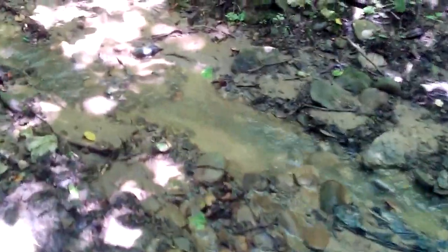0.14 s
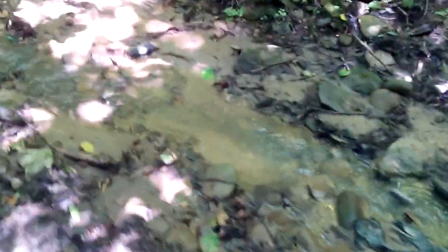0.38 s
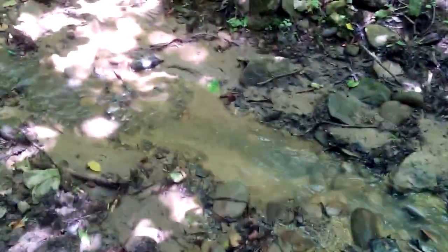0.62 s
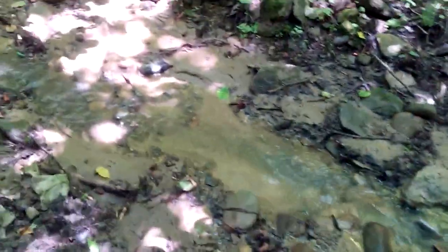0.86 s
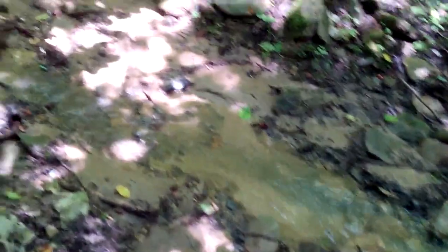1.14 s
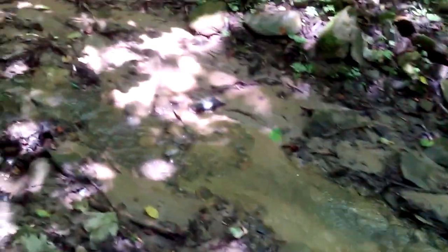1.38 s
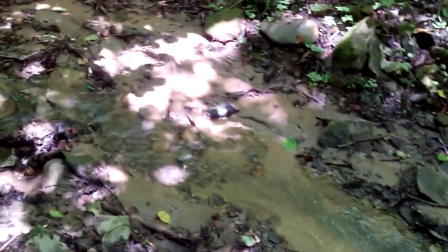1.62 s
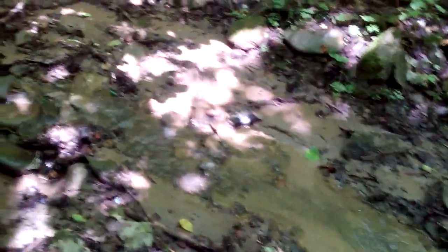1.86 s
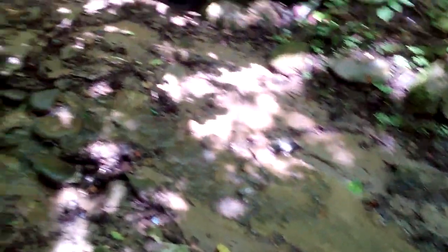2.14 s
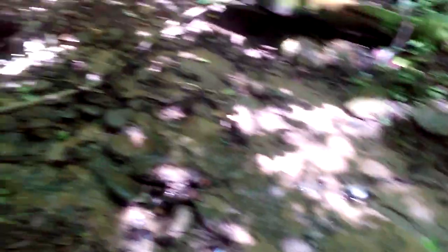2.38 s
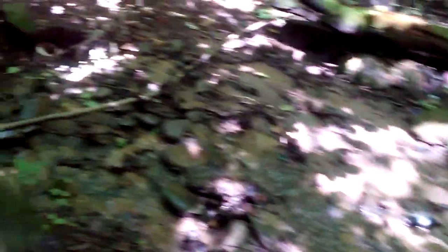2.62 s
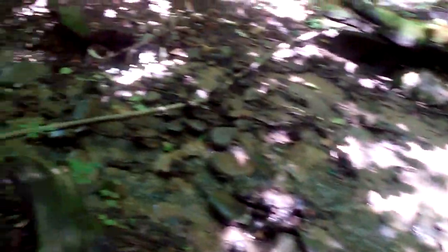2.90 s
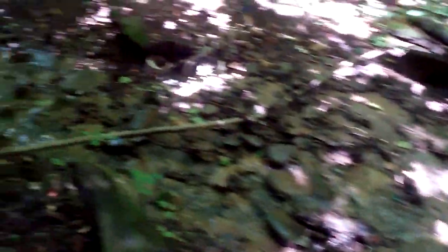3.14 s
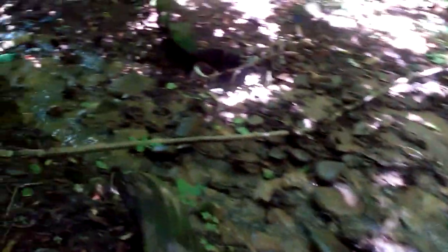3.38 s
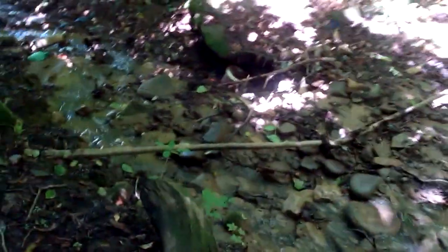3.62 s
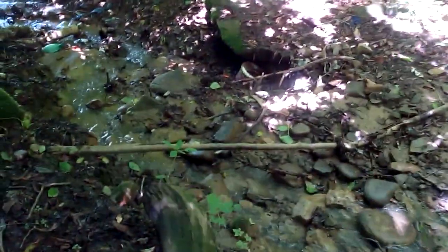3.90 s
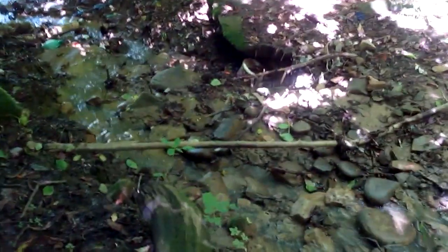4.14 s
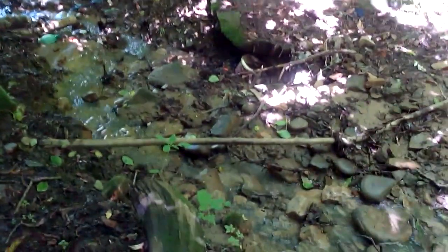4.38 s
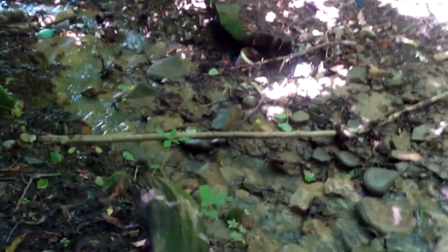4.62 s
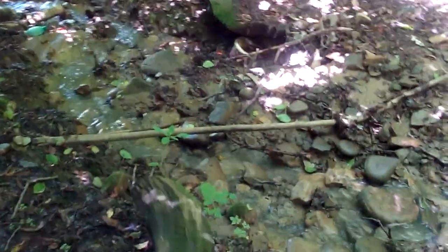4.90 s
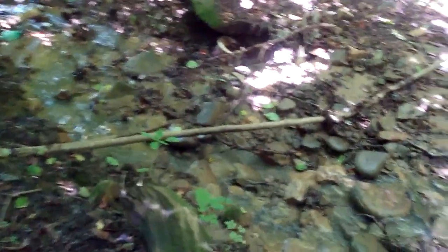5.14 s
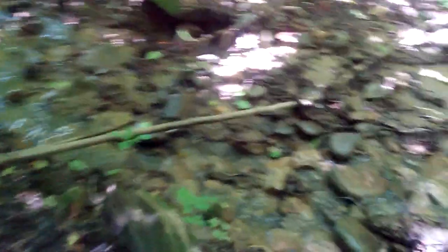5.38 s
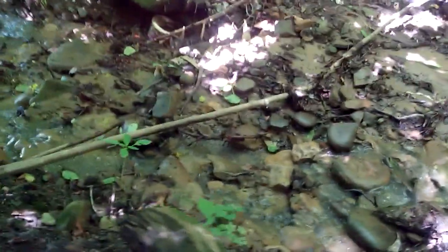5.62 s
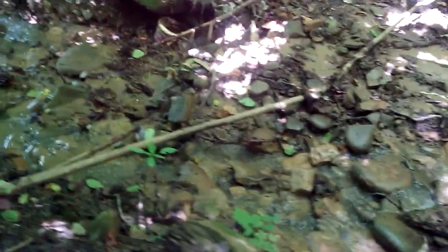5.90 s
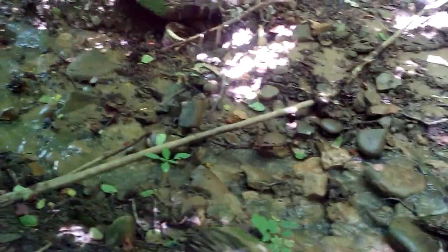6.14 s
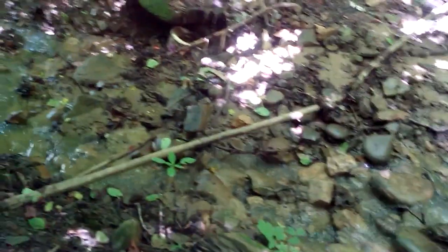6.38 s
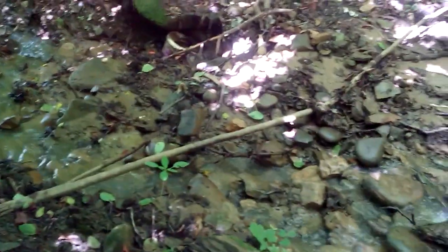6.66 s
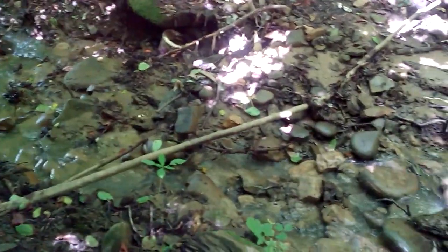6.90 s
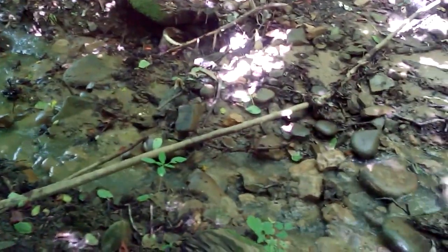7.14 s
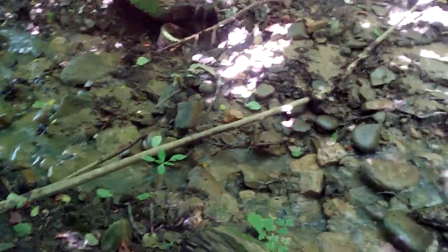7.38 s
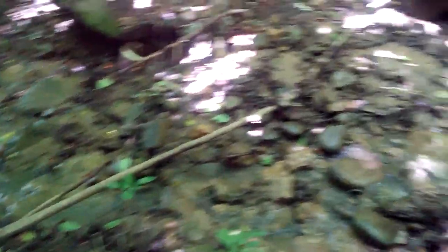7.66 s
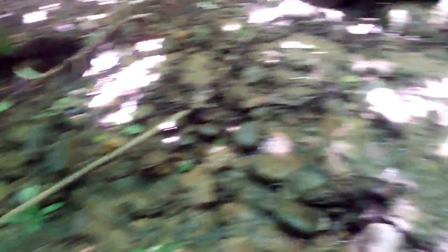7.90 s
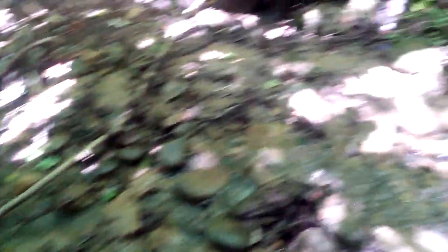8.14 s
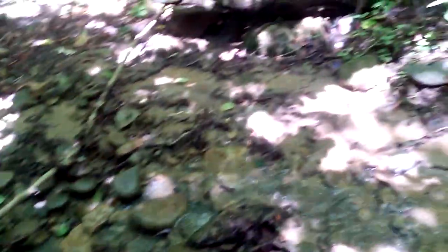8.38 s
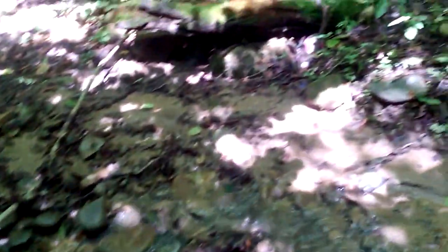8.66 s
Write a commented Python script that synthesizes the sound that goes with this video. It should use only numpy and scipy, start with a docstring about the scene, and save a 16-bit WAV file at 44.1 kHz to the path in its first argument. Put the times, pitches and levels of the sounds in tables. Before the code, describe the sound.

A shallow woodland stream trickles softly and continuously over stones, heard from a step away on a handheld microphone. Small bubbles plip and ring at scattered pitches above a fine bubbling texture and faint splashing ticks. A little hollow gurgle sits underneath. Just after eight seconds, a sharp dry snap cracks right at the microphone, far louder than the water, and the trickle goes on.

```python
"""A shallow forest stream trickles over pebbles a step from a handheld microphone.
Near bubbles ring for a few cycles, each with a wet spray, over swarms of small bubbles and droplet ticks.
A hollow under a stone gurgles by releasing large bubbles of nearly one size; shaped noise is farther water.
Soft low thuds are windowed sines; late on, something snaps right by the microphone: decaying modes, echo."""
import sys
import numpy as np
from scipy import signal
from scipy.io import wavfile
from scipy.ndimage import uniform_filter1d

SR = 44100
rng = np.random.default_rng(int(sys.argv[2]) if len(sys.argv) > 2 else 0)


def natural_amplitude(level_db):
    """Convert a level in decibels to a linear amplitude factor, elementwise."""
    exponent = np.asarray(level_db, float) / 20
    return 10 ** exponent


def put_to_file(sound):
    """Save the sound as 16-bit audio at rate SR, in the file named by the first command-line argument."""
    columns = np.atleast_2d(sound).T  # one column per channel
    safe = np.clip(columns, -1, 1)
    whole_steps = np.round(safe * 32767)
    wavfile.write(sys.argv[1], SR, whole_steps.astype(np.int16))


N = 386757

# clearest bubbles: (time [s], level [dB], nominal pitch [Hz], ring length to half amplitude [cycles])
CLEAR_BUBBLES = [(0.1371, -42, 1200, 10), (0.3636, -41.5, 5890, 8.3), (0.482, -40, 6180, 6),
                 (0.5087, -37.5, 1594, 11), (0.5898, -44.5, 646, 9), (0.6593, -43, 1035, 6.7),
                 (0.6928, -40, 5940, 9), (0.8891, -39, 5700, 17), (0.931, -37.5, 3000, 9),
                 (0.974, -39.5, 2190, 6), (1.005, -38, 2840, 10), (1.105, -39.5, 1460, 8.7),
                 (1.3533, -38, 2180, 10), (1.8511, -39.5, 1700, 7), (2.1263, -36.5, 1900, 5.5),
                 (2.4237, -36.5, 3880, 5.6), (2.6265, -38.5, 3420, 12), (2.6433, -40.5, 975, 6.4),
                 (2.6657, -50, 906, 14), (2.6931, -44, 8650, 5), (2.7047, -36, 3840, 7),
                 (2.7351, -44, 970, 8), (2.8105, -43, 7490, 7.6), (2.892, -37.5, 2870, 8.4),
                 (2.9367, -39.5, 7800, 9.2), (3.2188, -40.5, 2160, 11), (3.3136, -38, 3470, 7.7),
                 (3.462, -39, 1770, 7), (3.4949, -34.5, 2180, 7), (3.7694, -39, 3560, 7),
                 (3.824, -40, 9080, 7), (3.9194, -38, 3070, 4), (4.2008, -36.5, 2050, 8.2),
                 (4.2257, -38, 7940, 6.6), (4.324, -38.5, 6180, 6.3), (4.3322, -40, 2730, 8),
                 (4.5492, -37.5, 3140, 9.2), (4.5502, -48.5, 553, 5.1), (4.739, -44.5, 1070, 6.4),
                 (4.8768, -39, 1190, 5.3), (4.901, -37.5, 4630, 7.4), (4.9347, -43, 523, 2.8),
                 (4.9581, -44.5, 480, 3.8), (5.1502, -37, 1140, 6.7), (5.2195, -42, 1155, 14),
                 (5.24, -39, 7140, 6), (5.456, -37, 1520, 7.2), (5.483, -40.5, 1610, 6.8),
                 (5.7643, -36.5, 1950, 4.8), (6.2043, -38, 3980, 9), (6.253, -42.5, 940, 8.7),
                 (6.27, -35.5, 2500, 6.7), (6.2751, -43, 1090, 15), (6.2915, -41, 1900, 7),
                 (6.314, -41, 1020, 3.2), (6.895, -36.5, 2750, 9), (6.9524, -44.5, 528, 6.3),
                 (7.0561, -37, 1860, 7), (7.0696, -33, 1770, 8.1), (7.0835, -41, 1770, 8),
                 (7.2873, -40, 1740, 7), (7.418, -39.5, 1770, 8), (7.5312, -38.5, 2730, 5),
                 (7.6798, -39.5, 1780, 11), (8.044, -36.5, 2090, 6.8), (8.208, -39, 1160, 7.5),
                 (8.4561, -39, 5890, 7.9), (8.4773, -43, 5620, 10), (8.5017, -38.5, 1840, 6),
                 (8.6517, -37, 1860, 9), (8.6789, -38.5, 2150, 6.1), (8.7329, -39, 1830, 9.1)]
# chance bubbles, typical level by pitch: (pitch [Hz], level [dB])
PLIP_LEVELS = [(800, -51.5), (1400, -46), (3000, -44), (9500, -45.5)]
# swarm of small near bubbles, relative power density: (pitch [Hz], density [dB per Hz])
SWARM_SPECTRUM = [(250, -6), (400, -13.5), (520, -2.5), (760, -1.5), (1100, 2.5), (1760, 4), (2600, -4),
                  (3900, -3.5), (4800, -10), (7600, -11), (12000, -29)]
# running water: (time [s], gain of wash, swarm and splashes [dB], gurgle level [dB])
FLOW_COURSE = [(0, -0.1, -64), (1, 0.04, -70), (1.9, -.5, -65.5), (2.2, -0.4, -67), (3, -0.15, -63.5),
               (4, 0.2, -65), (5, .5, -64.5), (5.3, 1, -65.5), (6, 1.2, -68.5), (7, 0.45, -67),
               (7.6, .5, -69.5), (8.77, 0, -69)]
# snap: (time [s], peak of the blow [dB])
SNAP_EVENT = (8.1563, -6.5)
# snap modes: (frequency [Hz], level before swing factor [dB], t60 [s], first swing factor [+ out, - in])
SNAP_RINGS = [(118, -26.5, 0.044, -0.85), (192, -24.5, 0.022, -1), (700, -20, 0.013, 0.8),
              (1350, -13.5, 0.0049, 0.84), (1720, -15, 0.0046, 1), (4260, -9, 0.0019, 1),
              (6300, -1, 0.00093, 0.94), (9700, -9.5, 0.0011, -1), (12700, -11, 0.0013, 1)]
# soft low thuds, as of fingers shifting on the microphone: (time [s], level [dB])
FINGER_THUDS = [(2.166, -56), (4.3, -56), (7.265, -53), (8.617, -54)]
# farther water, relative power density: (frequency [Hz], density [dB per Hz])
WASH_SPECTRUM = [(30, -14), (60, -15), (108, -13.5), (262, -11), (388, -14.5), (517, -5), (764, -9.5),
                 (1290, -5), (1760, -1), (2350, -3), (2750, -7.5), (3860, -4), (4760, -10), (7800, -13),
                 (9000, -17), (11300, -20), (11800, -25), (15400, -22.5)]


def evened(x):
    """Scales to rms 1."""
    return x / np.sqrt(np.mean(x ** 2) + 1e-20)


def read(points, hz):
    """Reads a spectrum on a log-frequency axis."""
    f, value = np.transpose(points)
    return np.interp(np.log(hz + 1), np.log(f + 1), value)


def add(mix, start_s, sound):
    """Mixes a sound in at start_s."""
    part = mix[round(start_s * SR):][:len(sound)]
    part += sound[:len(part)]


def bubble(hz, half_cycles):
    """A pocket of air pinches off with a tick, rings, and climbs a little in pitch as it rises."""
    turns = np.arange(0, 4 * half_cycles + 2, hz / SR)
    envelope = (1 - np.exp(-turns / 0.24)) * .5 ** ((turns / half_cycles) ** 1.34)
    ring = envelope * np.sin(2 * np.pi * turns * (.99 + .0012 * turns))
    # the pinch is brighter than the ring
    tick = 3.48 * turns * np.exp(-turns / 0.6) * np.sin(2 * np.pi * 1.367 * turns)
    return ring + tick


def spatter(hz, noise):
    """The drop that makes a near bubble also throws a short wet spray, wide in pitch."""
    t = np.arange(len(noise)) / SR
    turns = np.arange(0, 2, 1.16 * hz / SR)
    wide = np.hanning(len(turns)) * np.sin(2 * np.pi * turns)  # two cycles span more than an octave
    spray = evened(np.convolve(noise, wide)[:len(t)])
    attack_s, decay_s = 0.0001, 0.0028
    return spray * (1 - np.exp(-t / attack_s)) * np.exp(-t / decay_s)


def plips():
    """Chance rows like CLEAR_BUBBLES; a gap between stones often soon frees another of like size."""
    rate_per_s, low_hz, high_hz = 20, 800, 9490
    spread_db, min_cycles, max_cycles = 4, 4.5, 10
    train_share, train_gap_s, pitch_scatter = .4, .018, .08
    gap, pitch, luck, length, again, stray = rng.random((500, 6)).T
    follows = again < train_share
    pause_s = (1 / rate_per_s - train_share * train_gap_s) / (1 - train_share)  # holds the mean rate
    born_s = np.cumsum(-np.log(1 - gap) * np.where(follows, train_gap_s, pause_s))
    leader = np.maximum.accumulate(np.where(follows, 0, np.arange(len(gap))))
    hz = low_hz * (high_hz / low_hz) ** pitch[leader]
    hz = hz * (1 + pitch_scatter * (2 * stray - 1))
    db = read(PLIP_LEVELS, hz) + spread_db * (2 * luck - 1)
    half_cycles = min_cycles + (max_cycles - min_cycles) * length
    return list(zip(born_s, db, hz, half_cycles))[:np.sum(born_s < N / SR)]


def shower(pitches_hz, levels_db, per_s, spread_db, cycles):
    """Each bubble size has its own random train; most are faint, a few stand out; rms 1."""
    out = np.zeros(N)
    for hz, db in zip(pitches_hz, levels_db):
        when, luck, length = rng.random((1000, 3)).T
        born_s = np.cumsum(-np.log(1 - when)) * len(pitches_hz) / per_s  # uneven gaps
        inside = born_s < N / SR
        strength = natural_amplitude(spread_db * np.minimum(-np.log(1 - luck), 2.8))
        train = np.zeros(N)
        train[(born_s[inside] * SR).astype(int)] = strength[inside]
        # sqrt(hz) offsets the shorter rings of small bubbles
        voice = natural_amplitude(db) * np.sqrt(hz) * bubble(hz, cycles * (.5 + length[0]))
        out += signal.oaconvolve(train, voice)[:N]
    return evened(out)


def swarm():
    """Small bubbles across all sizes; small ones are born per octave as often as large ones."""
    hz = np.geomspace(240, 13000, 70)
    width_db = 10 * np.log10(hz)  # power per Hz times the span that each size covers
    levels_db = read(SWARM_SPECTRUM, hz) + width_db
    return natural_amplitude(-53.5) * shower(hz, levels_db, per_s=1500, spread_db=3.0, cycles=6.3)


def splashes():
    """Droplets thrown off the pebbles land with short bright ticks."""
    hz = np.geomspace(2500, 7000, 12)
    return natural_amplitude(-62.5) * shower(hz, -3 * np.log2(hz), per_s=150, spread_db=4.0, cycles=1.37)


def surge(depth_db):
    """The water slops unevenly over the pebbles: a gain swinging at 3 to 60 Hz, rms depth_db."""
    t = np.arange(0, N / SR + .01, .002)
    slop = sum(np.sin(2 * np.pi * (f * t + rng.random())) / f ** 0.23 for f in np.geomspace(3, 60, 30))
    return natural_amplitude(depth_db * np.interp(np.arange(N) / SR, t, evened(slop)))


def gurgle():
    """The hollow under a stone keeps releasing large bubbles of nearly one size; rms 1."""
    hollow_hz = 493
    hz = hollow_hz * np.linspace(.95, 1.1, 6)
    return shower(hz, 0 * hz, per_s=40, spread_db=2.0, cycles=4.6)


def snap():
    """A sharp blow rings its modes; the stones send back a scattered echo."""
    t = np.arange(4000) / SR
    rings = sum(swing * natural_amplitude(db - 60 * t / t60_s) * np.sin(2 * np.pi * hz * t)
                for hz, db, t60_s, swing in SNAP_RINGS)
    contact_s = 0.000078
    blow = np.convolve(rings, np.hanning(4))[:len(t)] * (1 - np.exp(-t / contact_s))
    late_s = np.maximum(t - .001, 0)
    scatter = rng.standard_normal(len(t)) * late_s / 0.0032 * np.exp(-late_s / 0.0035)
    crack = np.diff(blow[:12] * np.hanning(12), prepend=0)  # only the bright edge scatters
    echo = natural_amplitude(-24.0) * np.convolve(scatter, crack)[:len(t)]
    peak_db = SNAP_EVENT[1]
    return natural_amplitude(peak_db) * (blow + echo) / np.max(blow)


def thud():
    """A soft low knock: about two cycles of 170 Hz under a smooth window."""
    n = np.arange(500)
    return np.hanning(500) * np.sin(2 * np.pi * 170 * n / SR)


def wash():
    """Farther water blurs into noise: random short-time spectra with small louder and softer patches."""
    frames, hz = N // 128 + 5, np.fft.rfftfreq(512, 1 / SR)
    real, imag, patches = rng.standard_normal((frames, 257, 3)).T
    patches = uniform_filter1d(patches, size=8, axis=0)
    patches = evened(uniform_filter1d(patches, size=8, axis=1))
    level_db = read(WASH_SPECTRUM, hz)[:, None] + 1.73 * patches
    spectra = (real + 1j * imag) * natural_amplitude(level_db)
    noise = signal.istft(spectra, nperseg=512, noverlap=384)[1][:N]
    return natural_amplitude(-53) * evened(noise)


def preamp_flutter():
    """Low flutter of the preamp: leaky-integrated noise."""
    return natural_amplitude(-90) * evened(signal.lfilter([1], [1, -.995], rng.standard_normal(N)))


def scene():
    """Running water, near bubbles with their spray, thuds and the snap."""
    time_s, flow_db, gurgle_db = np.transpose(FLOW_COURSE)
    t = np.arange(N) / SR
    water = wash() + surge(depth_db=1.41) * (swarm() + splashes())
    mix = natural_amplitude(np.interp(t, time_s, flow_db)) * water
    mix += natural_amplitude(np.interp(t, time_s, gurgle_db)) * gurgle()
    drops = CLEAR_BUBBLES + plips()
    noises = rng.standard_normal((len(drops), 600))
    for (start_s, db, hz, half_cycles), noise in zip(drops, noises):
        add(mix, start_s, natural_amplitude(db - 11.0) * spatter(hz, noise))
        add(mix, start_s, natural_amplitude(db) * bubble(hz, half_cycles))
    for start_s, db in FINGER_THUDS:
        add(mix, start_s, natural_amplitude(db) * thud())
    add(mix, SNAP_EVENT[0], snap())
    return mix[None]


def low_pass(x):
    """Removes everything above the highest recorded frequency."""
    return signal.sosfilt(signal.butter(12, 16450, fs=SR, output="sos"), x)


def record(dry):
    """The microphone drops the deep bass and the top of the treble; its preamp adds low flutter."""
    cut = signal.sosfilt(signal.butter(4, 70, "high", fs=SR, output="sos"), dry)
    cut += preamp_flutter()
    edge = signal.firwin(301, 15500, window=("kaiser", 5), fs=SR)
    mix = signal.oaconvolve(cut, edge[None], "same")
    return low_pass(mix)


dry = scene()
out = record(dry)
put_to_file(out)
```